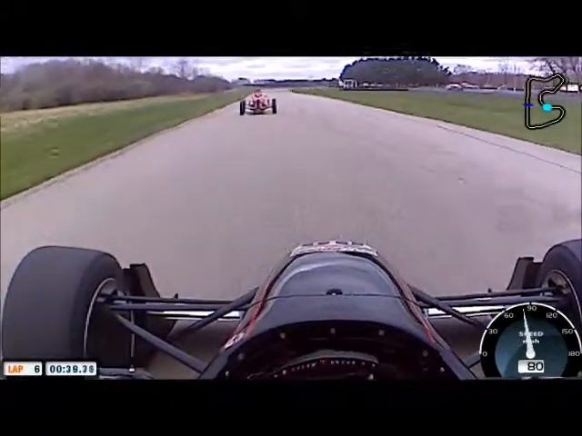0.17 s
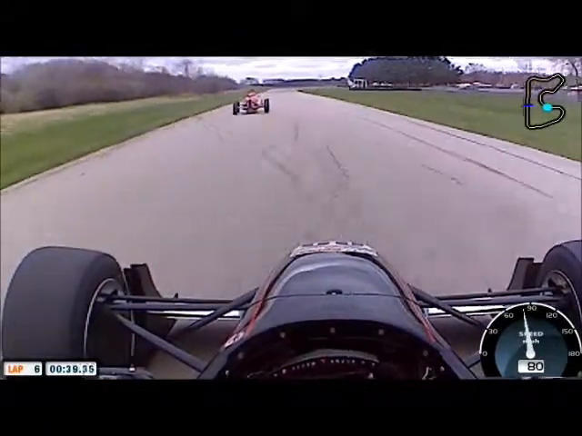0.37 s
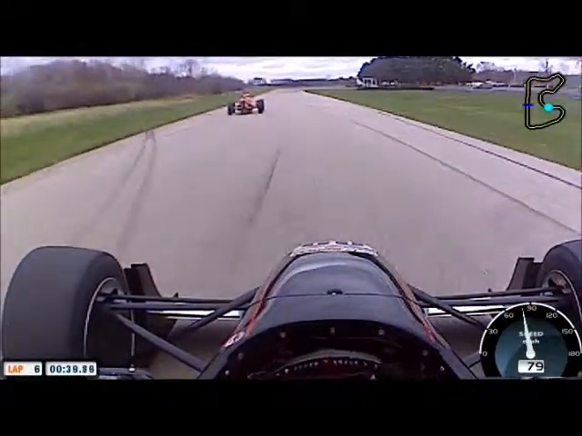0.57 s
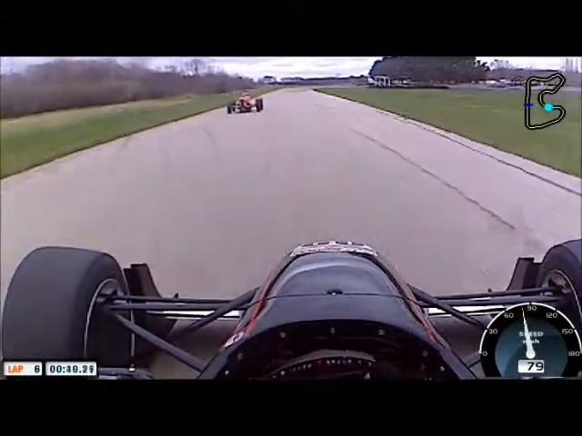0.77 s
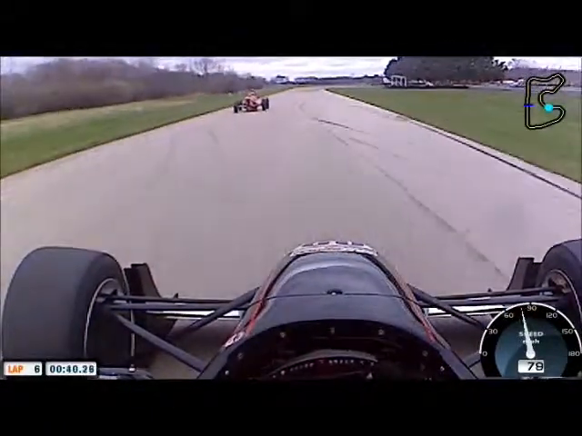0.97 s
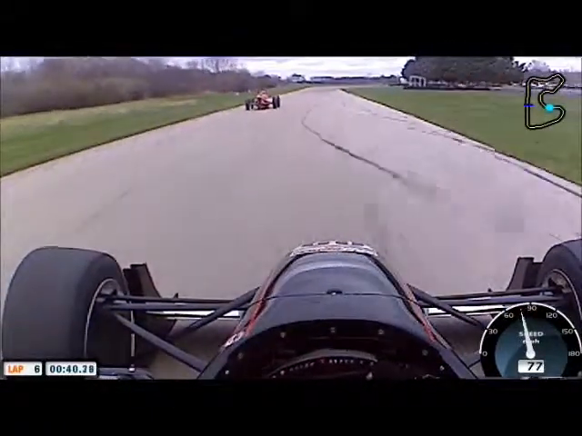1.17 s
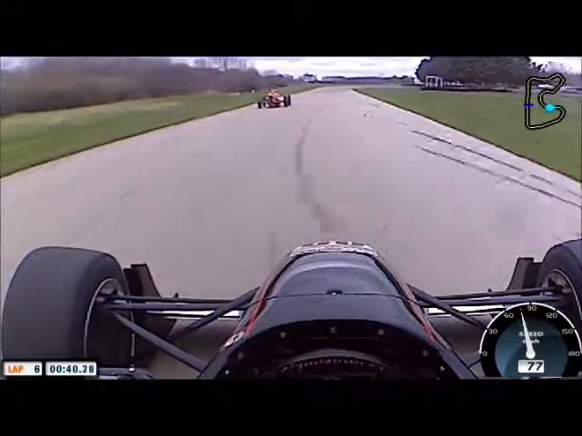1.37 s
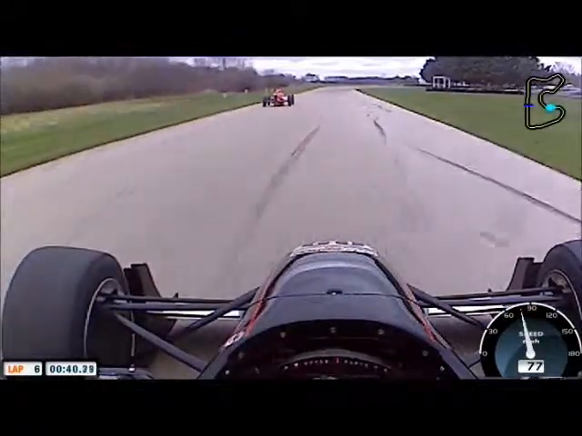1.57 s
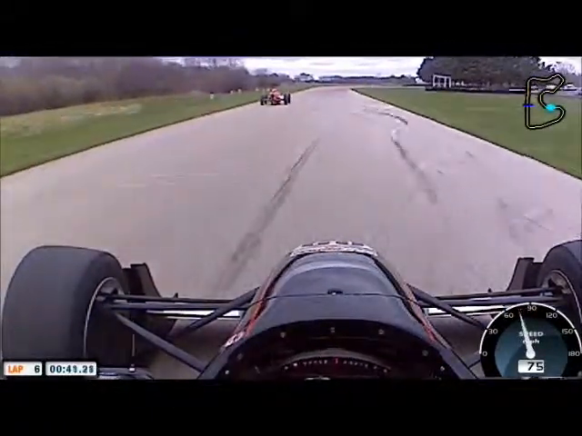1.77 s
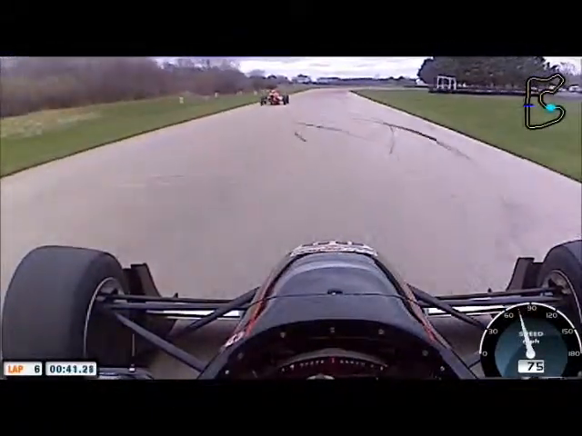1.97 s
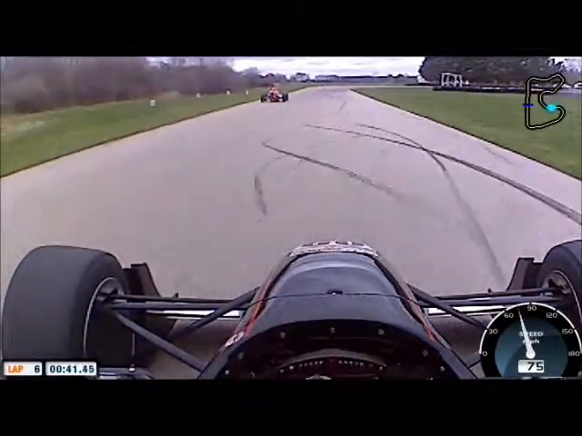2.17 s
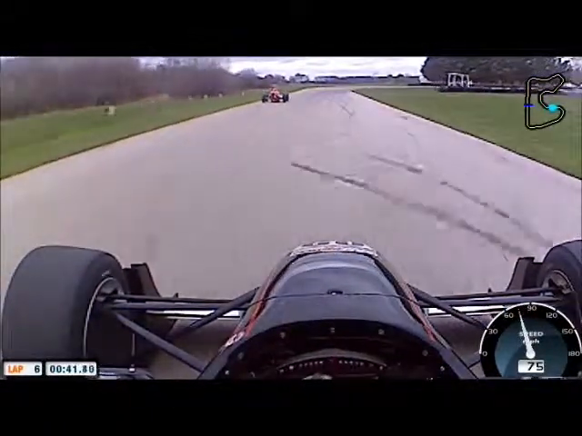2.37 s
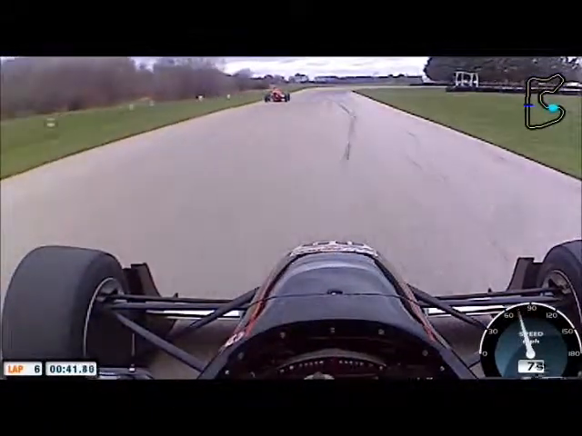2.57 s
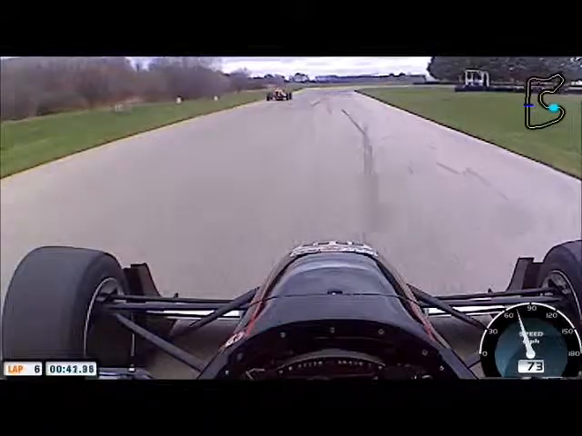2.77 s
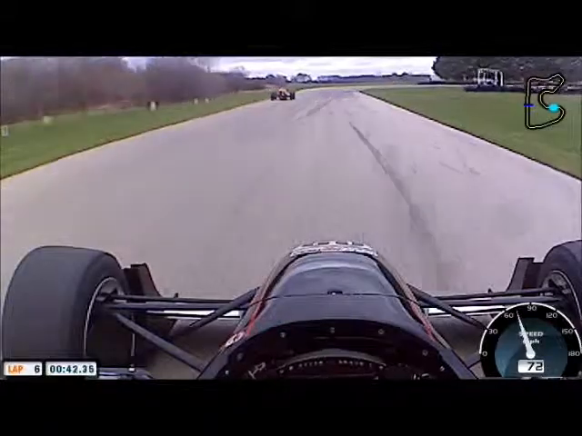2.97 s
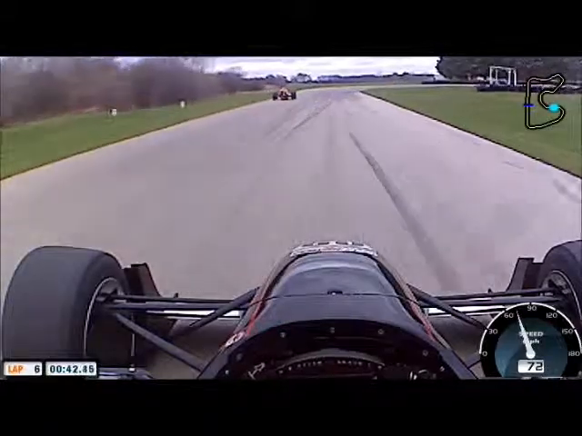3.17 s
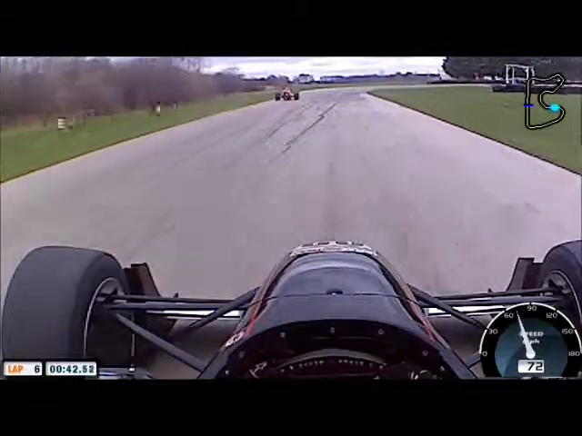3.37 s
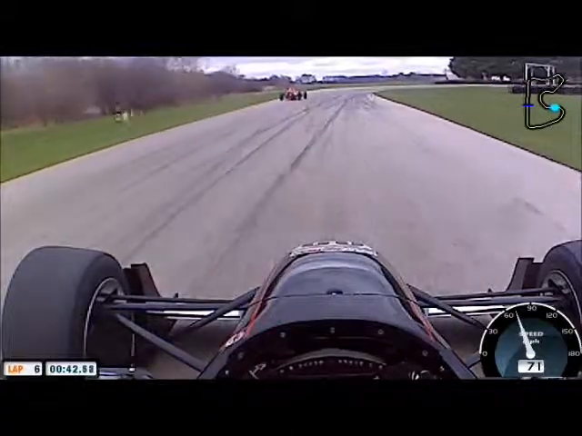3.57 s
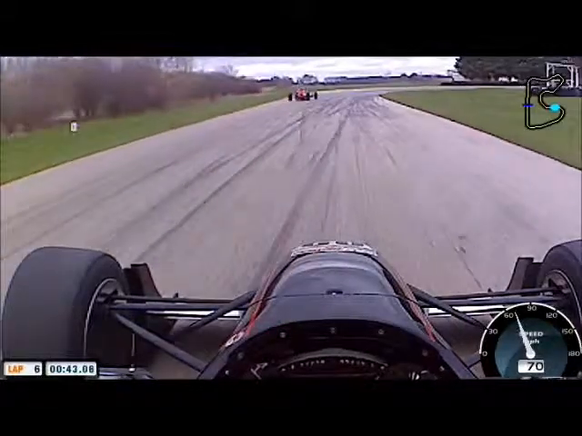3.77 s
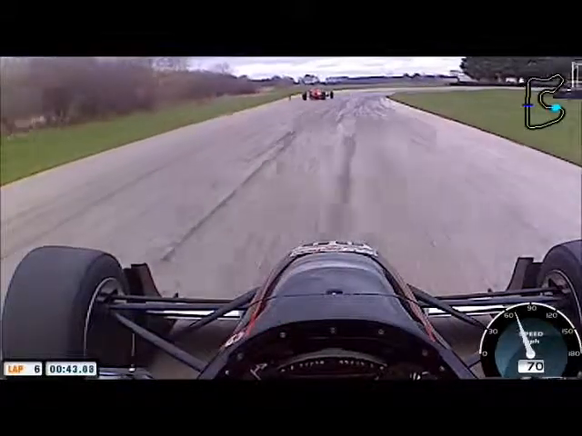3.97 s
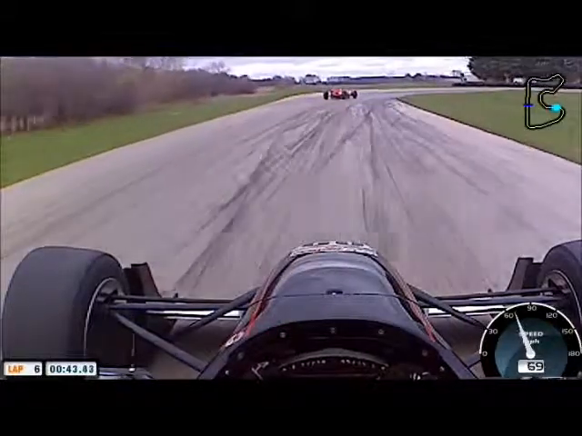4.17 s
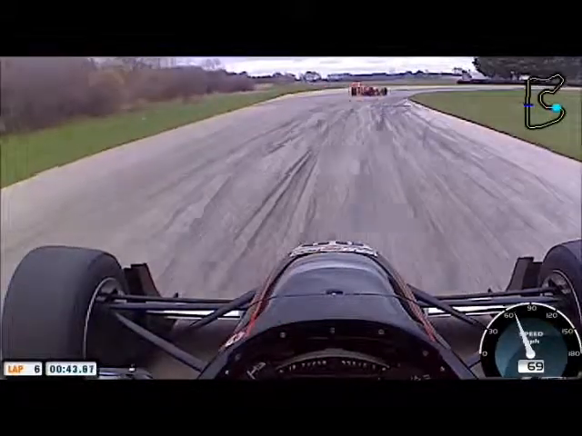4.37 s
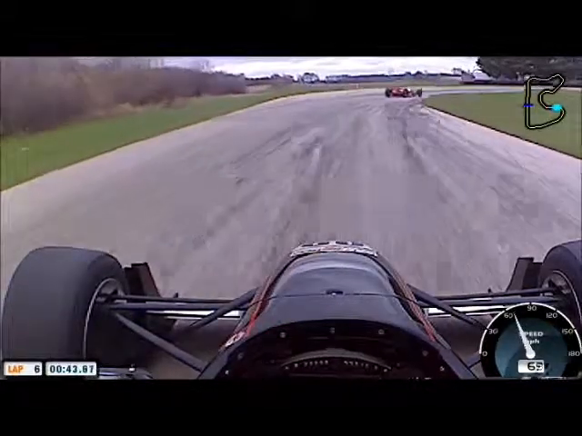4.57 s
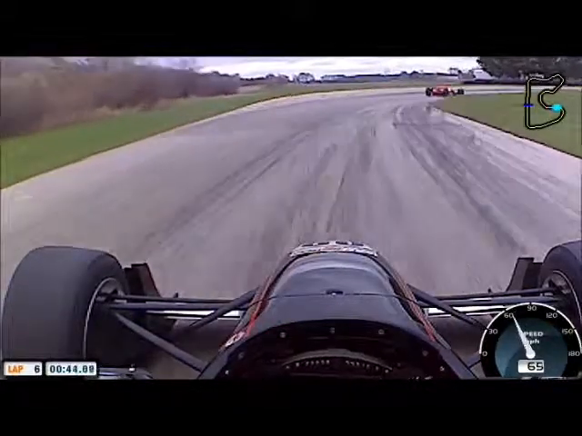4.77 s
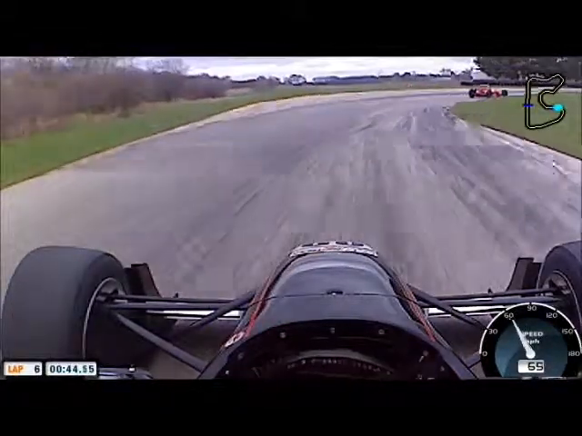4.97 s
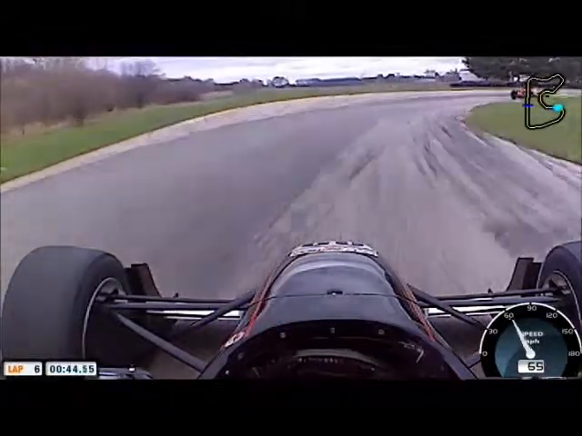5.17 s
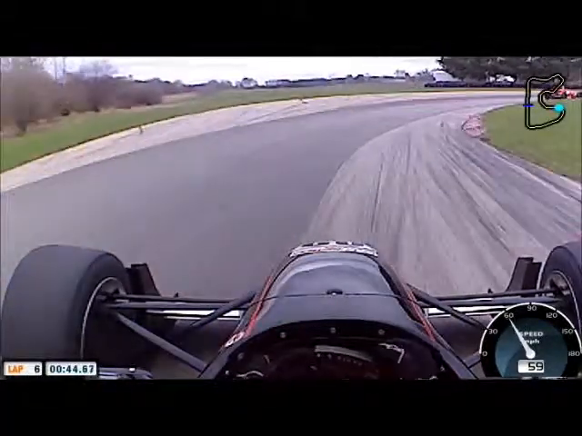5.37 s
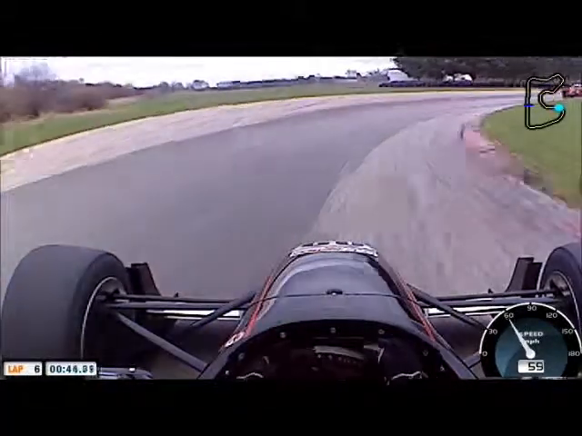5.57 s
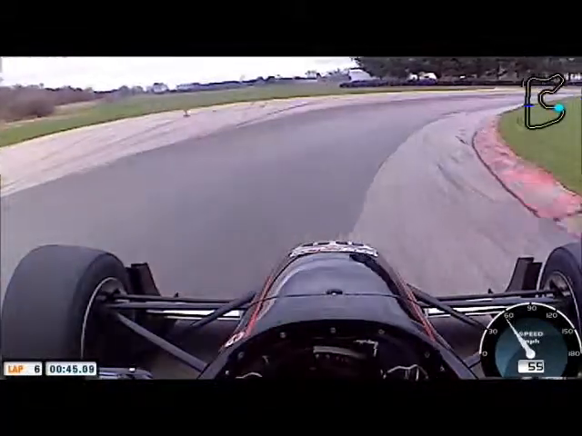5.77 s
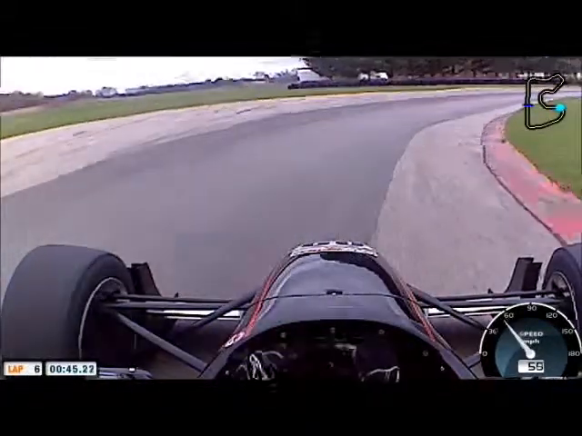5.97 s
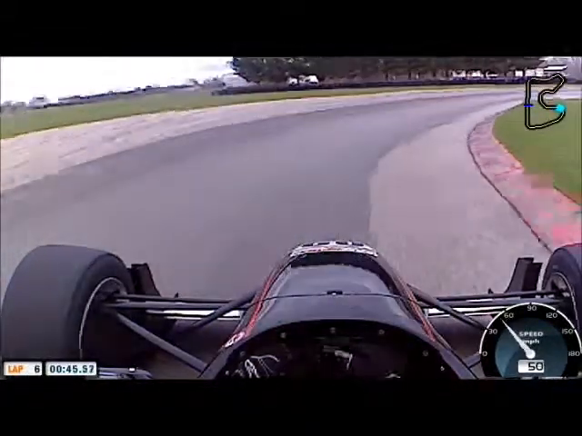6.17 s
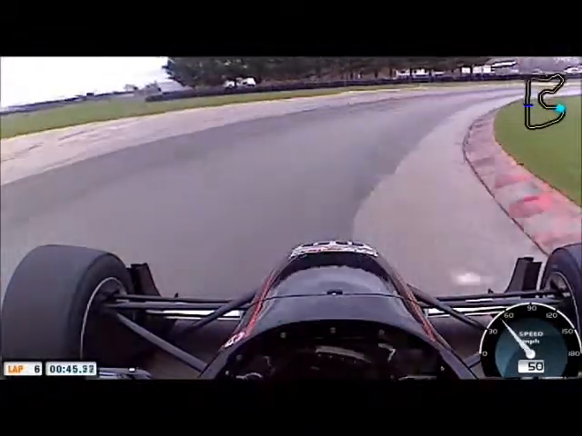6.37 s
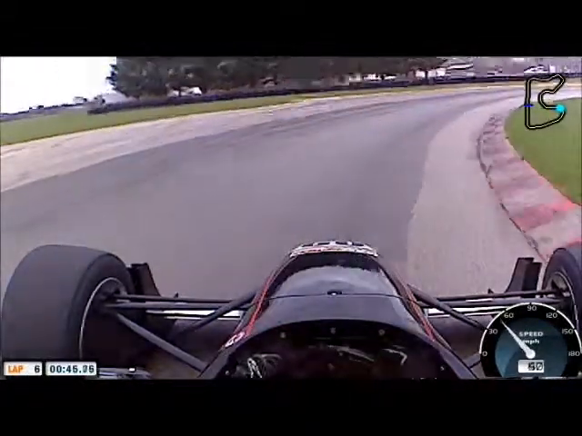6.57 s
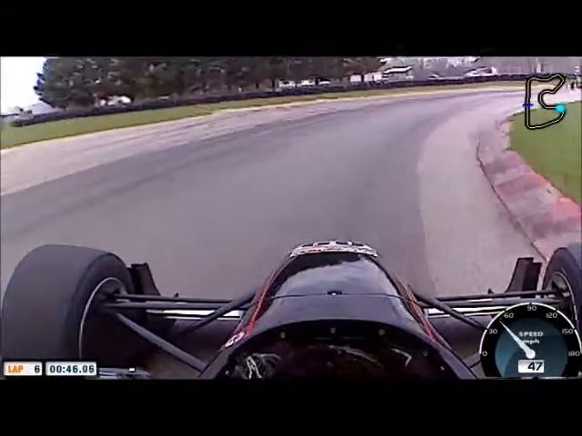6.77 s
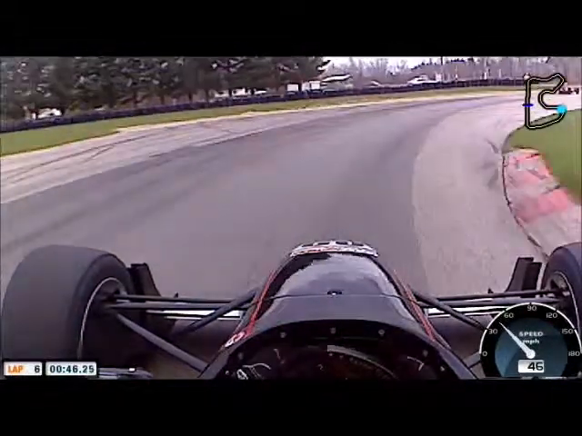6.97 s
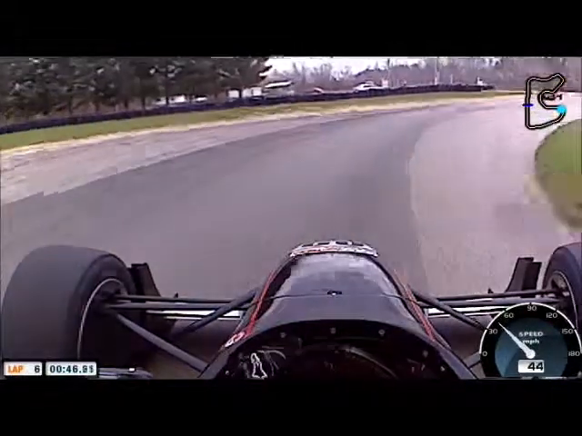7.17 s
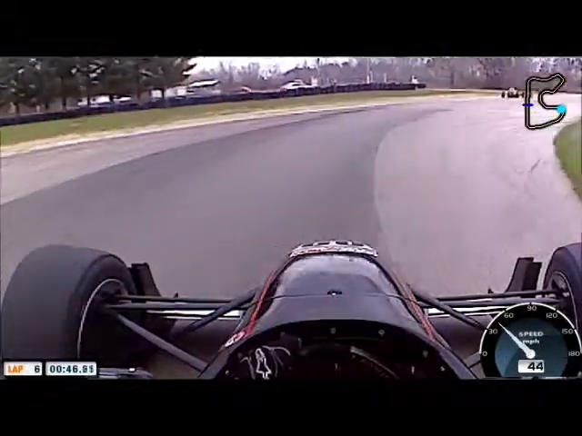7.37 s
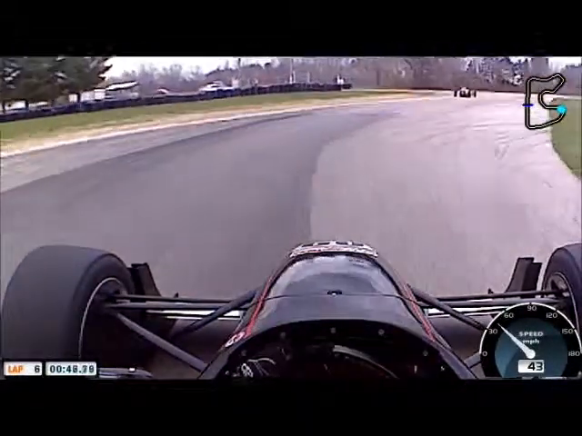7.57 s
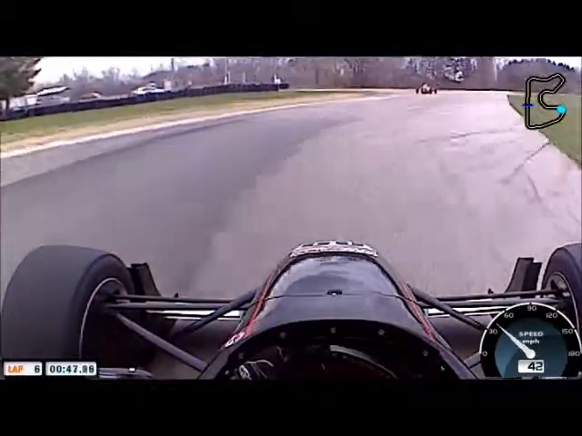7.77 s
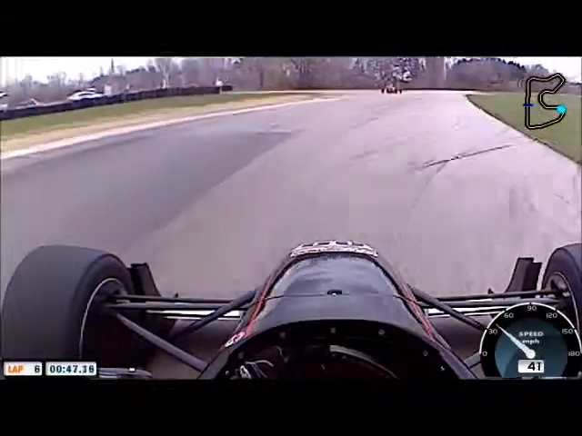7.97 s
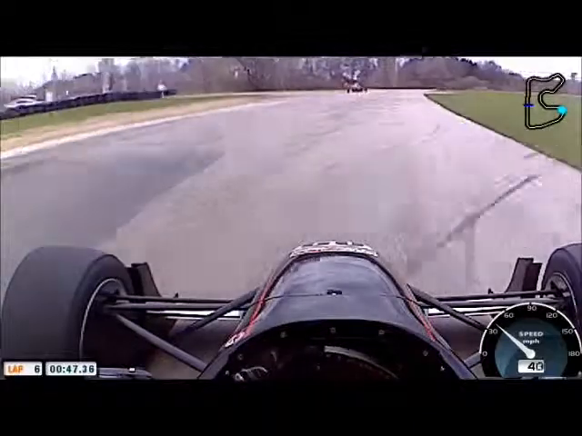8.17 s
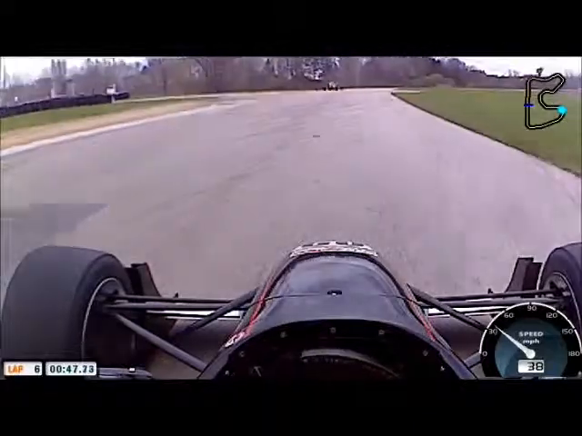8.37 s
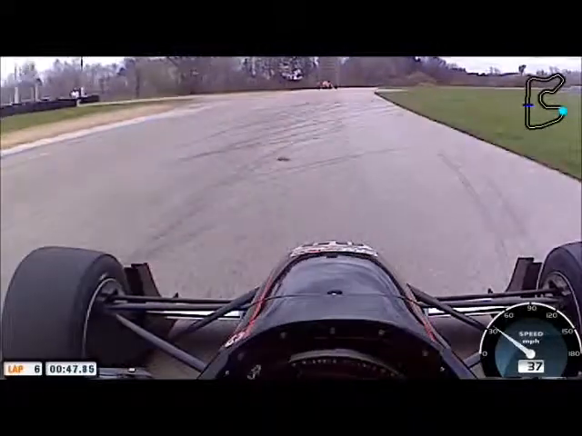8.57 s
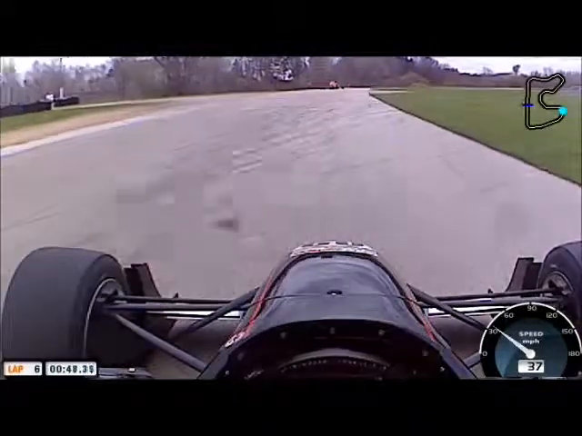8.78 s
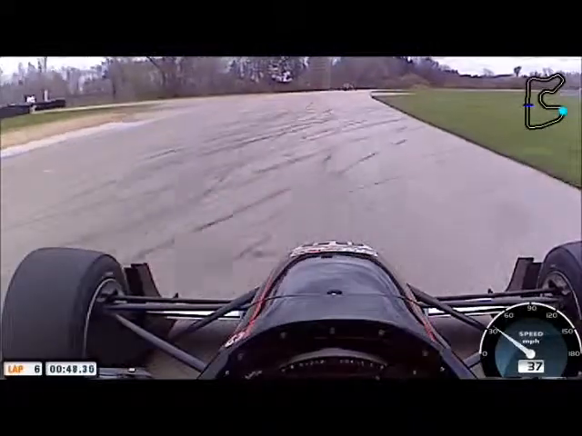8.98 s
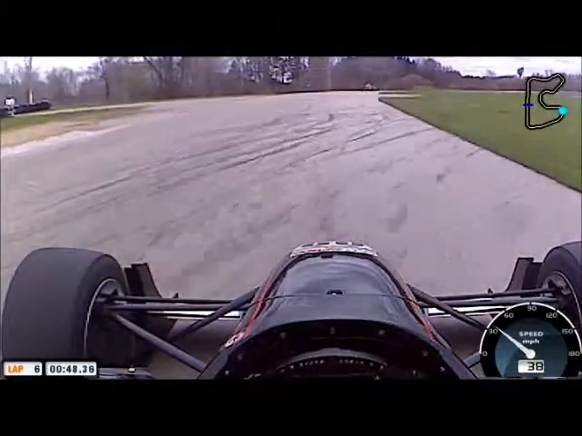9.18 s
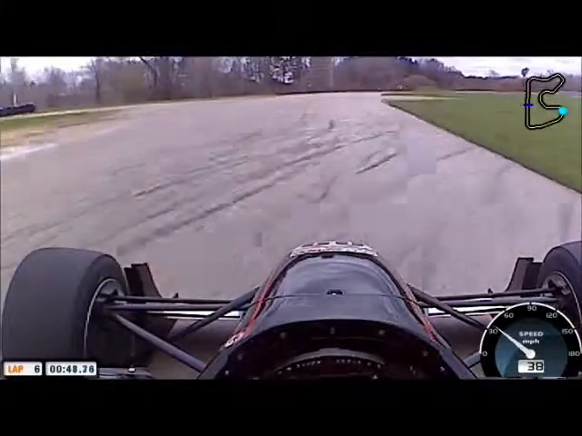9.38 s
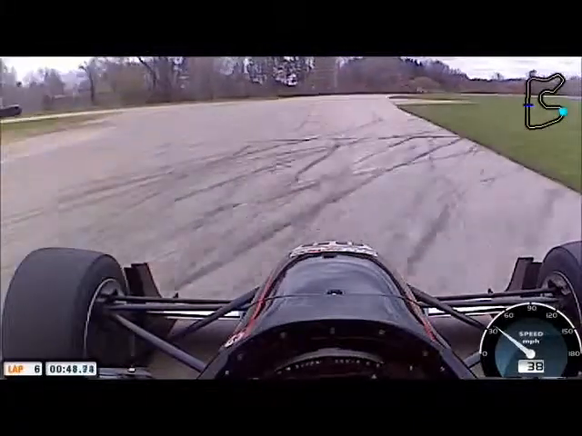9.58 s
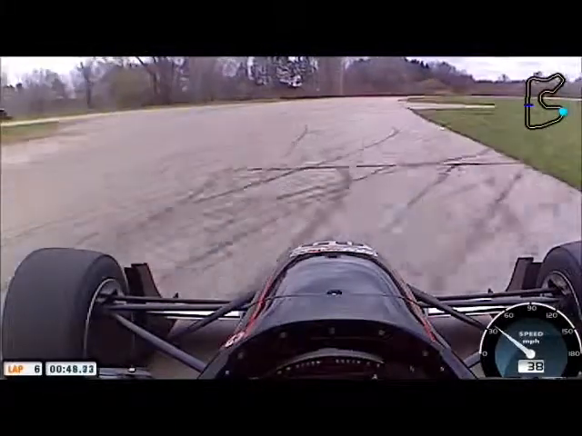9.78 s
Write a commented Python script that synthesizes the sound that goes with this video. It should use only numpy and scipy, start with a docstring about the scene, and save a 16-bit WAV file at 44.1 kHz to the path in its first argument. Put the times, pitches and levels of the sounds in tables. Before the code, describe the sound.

On board an open-wheel racing car, a deep engine growl lasts about a third of a second, drops in pitch and dies with a dull clunk. Wind buffeting and tyre rumble carry on, with a brief hum and scattered bumps. Later, metal clicks, faint brake squeals and tyre scrub mark a bend as the car slows. The microphone sits just above the cockpit, with dull, limited treble.

```python
"""On board an open-wheel racing car: the engine runs for a third of a second, then dies with a driveline clunk.
The car coasts on: shaped noise for wind, tyres and hiss follows speed and asphalt, and bumps thud in short bursts.
A drivetrain hum swells early and a whine enters later; the engine of a car ahead, a wavering tone, drones throughout.
From about 4.4 s cockpit metal clicks in noise bursts and the brakes squeal in sagging tones.
From 5 s the tyres scrub through a bend in band-shaped noise, and the pads rub in pulsed noise."""
import sys
import numpy as np
from scipy import signal
from scipy.fft import rfft, irfft, next_fast_len
from scipy.io import wavfile
from scipy.ndimage import map_coordinates

SR = 44100
rng = np.random.default_rng(int(sys.argv[2]) if len(sys.argv) > 2 else 0)


def unload_wav(signal):
    """Save mono or channel-first audio to the path in sys.argv[1] as 16-bit WAV at rate SR, clipped to [-1, 1]."""
    wavfile.write(
        sys.argv[1],
        SR,
        np.round(np.clip(np.atleast_2d(signal).T, -1, 1) * 32767).astype(np.int16),
    )


N = 433944

# Own engine, mean revs: t/s, four-stroke cycle rate f/Hz
ENGINE_REVS = [(0, 47.17), (0.29, 46.76), (0.36, 44.23), (0.42, 39), (0.55, 31.2), (0.7, 21.9)]
# Own engine, mix before trim: t/s, exhaust and roar level/dB, valve clatter level/dB
ENGINE_LEVELS = [(0, -11.5, -40), (0.12, -10, -40), (0.26, -12, -42), (0.32, -11.5, -35.5), (0.4, -16, -44),
                 (0.44, -19, -50), (0.55, -19, -80), (0.72, -48, -100)]
# Exhaust orders: multiple of the cycle rate, relative level/dB
EXHAUST_ORDERS = [(1, 1.5), (2, -0.5), (3, -10), (4, -9.5), (5, -15.5), (6, -29.5), (7, -33), (8, -37.5),
                  (9, -34), (10, -34)]
# Engine roar, spectrum: f/Hz, relative level/dB
ROAR_SPECTRUM = [(200, -3), (350, 1.5), (500, -6), (700, -9.5), (860, -25), (1050, -24), (1300, -12.5),
                 (1700, -19), (2400, -29.5)]
# Valve clatter, spectrum: f/Hz, relative level/dB
VALVE_SPECTRUM = [(1290, -38), (2200, -13), (2460, -14), (2750, -5), (2980, -7.5), (3620, -8.5), (4270, 2),
                  (4960, -10.5), (5940, -3), (6340, -11), (6790, -8), (7480, -13), (7890, -14),
                  (10300, -50), (17400, -120)]

# Road speed: t/s, speed/(m/s)
ROAD_SPEED = [(0, 38), (2, 35.2), (4, 31.1), (5, 24.9), (6, 23.3), (8, 18.4), (9.84, 14.8)]
# Roughness of the asphalt under the car: t/s, relative level/dB
ASPHALT_ROUGHNESS = [(0.75, -0.9), (1.15, 0.1), (1.7, -0.4), (1.95, -0.1), (2.3, 1.0), (2.65, -0.5),
                     (3.15, 3.5), (4.0, -1), (4.35, 1.1), (5.15, -3), (6.3, -2.4), (6.7, 0.4), (7.15, -2.0),
                     (7.55, 2.0), (8.2, -0.5), (8.8, 2.5), (9.15, 0), (9.84, 0.4)]
# Wind buffet, spectrum: f/Hz, relative level/dB
BUFFET_SPECTRUM = [(8, -15), (18, -1), (30, 0), (50, 0), (64, -6.5), (100, -32.5), (200, -79.5)]
# Tyre rumble, spectrum: f/Hz, relative level/dB
TYRE_SPECTRUM = [(30, -41), (48, -8.5), (62, 0), (85, -0.5), (108, -2), (130, -5), (165, -8.5), (200, -20),
                 (350, -61)]
# Road roar, also the thud of a bump, spectrum: f/Hz, relative level/dB
ROAD_SPECTRUM = [(110, -34), (175, -0.5), (225, -0.5), (270, -4.5), (320, -11), (400, -14.5), (500, -23),
                 (600, -24), (700, -32), (800, -41.5), (900, -47.5), (1300, -68.5)]
# Ring of the camera's housing, spectrum: f/Hz, relative level/dB
HOUSING_SPECTRUM = [(600, -38.5), (860, -26.5), (1000, -16.5), (1130, -9.5), (1210, -16), (1340, -2.5),
                    (1430, 2.5), (1480, 0.5), (1560, -15), (1760, -20), (1860, -13), (1980, -24),
                    (2600, -42.5)]
# Air and tyre hiss, spectrum: f/Hz, relative level/dB
HISS_SPECTRUM = [(1500, -20.5), (2120, -7), (2400, -2), (2750, 2), (3250, -3.5), (3650, -5), (3900, -6),
                 (4300, -5), (5200, -15.5), (5850, -12), (6250, -14), (6720, -7.5), (7300, -16.5),
                 (8000, -18.5)]
# Tyres sliding sideways, spectrum: f/Hz, relative level/dB
SCRUB_SPECTRUM = [(205, 8), (260, 39.5), (400, 11), (720, 13.5), (860, -2), (1150, 6.5), (1400, 18.5),
                  (1900, -9), (2800, -2), (3650, -3), (4600, -8), (5200, -9.5), (5800, -9.5), (6250, -7.5),
                  (6700, 1), (7900, -15)]
# Narrow resonances of the housing and panels: f/Hz, width/Hz, boost/dB
PANEL_RESONANCES = [(1660, 77, 5.5), (3635, 74, 4.5), (4800, 60, 6.5), (5500, 110, 2.5), (5850, 120, 2.5)]

# Brake squeals: t/s, length/s, starting pitch f/Hz, level before flicker/dB
BRAKE_SQUEALS = [(4.422, .52, 4590, -68.5), (5.416, .32, 4540, -73)]
# Pads brushing the discs: t/s, length/s, level at mid-rub/dB
PAD_RUBS = [(5.38, .4, -64.5), (8.97, .24, -68.5), (9.417, .5, -67)]
# Pad rub, spectrum: f/Hz, relative level/dB
PAD_SPECTRUM = [(3000, -19), (3900, -2), (4350, 1), (5000, -12.5), (5900, -10), (7000, -9), (7900, -15)]
# Bumps in the track, before envelope and trim: t/s, thud level/dB, housing ring level/dB
TRACK_BUMPS = [(0.791, -21, -50), (1.103, -20, -28.5), (2.819, -22, -53), (3.126, -20, -46),
               (3.681, -24, -32), (3.708, -16, -49), (4.262, -17, -38), (6.655, -24, -55),
               (8.256, -20, -46)]
# Cockpit clicks, before envelope and trim: t/s, level/dB, treble tilt/dB, body tilt/dB
COCKPIT_CLICKS = [(4.353, -43, -3, -12.5), (4.419, -46, -4, -12), (4.534, -35.5, -6, 1),
                  (4.745, -46.5, 1.5, -17), (4.816, -44, 0, -14), (5.8113, -34.5, -17, -19),
                  (5.8207, -35.5, -15, -12), (5.8523, -38, -9, -8), (5.874, -43, -12, -11),
                  (6.153, -34.5, -2, -6), (6.2532, -44, -6, -10), (6.2744, -35, -16, -10),
                  (6.3365, -47, -10, -12), (6.5063, -24.5, 0.5, -.5), (6.5124, -32, 0, 5),
                  (6.5288, -34.5, -9, 0), (6.573, -33.5, 1, 0), (6.6274, -44, -4, -10)]
# Small metal parts, spectrum: f/Hz, relative level/dB
METAL_SPECTRUM = [(800, -23), (1100, 1.5), (1370, 19), (1700, -2), (2100, -5.5), (2700, 1), (3700, -1.5),
                  (4750, -1.5), (5150, -11.5), (5600, -7.5), (6700, -8.5), (7900, -22.5)]
# Resonances of the small metal parts: f/Hz, width/Hz, boost/dB
METAL_RESONANCES = [(2760, 120, 3.5), (3350, 140, 4), (3750, 130, 5), (4280, 130, 6), (4920, 150, 5.5),
                    (5750, 200, 5), (6330, 130, 3), (6680, 130, 5)]
# Car ahead: t/s, mean exhaust note f/Hz, level before wavering/dB
CAR_AHEAD = [(0, 495.7, -54.5), (2.4, 523, -58), (3.5, 520, -65), (5, 460, -60), (5.4, 480, -54.5),
             (6.3, 480, -59.5), (7, 497, -63), (7.8, 517.3, -59), (9.84, 567.5, -60)]

CRUISE_M_PER_S = 30  # speed at which a rolling noise has its nominal level
WHEEL_M = 1.72  # distance rolled in one wheel turn
BEND_S, BEND_RISE_S, BEND_HOLD_S, BEND_RELEASE_S = 5.02, .35, 1, 2.6  # turn-in, then load envelope
SQUEAL_SAG_HZ_PER_S2 = 2200
RUBS_PER_TURN = 2
TOP_HZ = 7860  # middle of the 400 Hz wide treble cutoff


def amp(db):
    """Decibels to linear gain."""
    return 10 ** (np.asarray(db) / 20)


def unit(x):
    """x scaled to rms 1."""
    return x / np.sqrt(np.mean(x ** 2) + 1e-20)


def curves(rows):
    """One value per sample for each column after the time."""
    s, *cols = np.transpose(rows)
    return [np.interp(np.arange(N) / SR, s, c) for c in cols]


def wobble(rate):
    """A smooth random curve with rate knots a second."""
    knots = rng.standard_normal(int(N * rate / SR) + 4)
    return map_coordinates(knots, [np.arange(N) * rate / SR])


def turns(hz):
    """Cycles completed at a changing rate."""
    return np.cumsum(hz) / SR


def wheel_rate():
    """Wheel turns per second at the current road speed."""
    return curves(ROAD_SPEED)[0] / WHEEL_M


def swell(start, rise, hold, release):
    """An envelope in seconds that rises to 1, holds and falls back to 0."""
    t = np.arange(N) / SR - start
    return np.clip(np.minimum(t / rise, (rise + hold + release - t) / release), 0, 1)


def strike(t, t60, attack):
    """A quick onset with time constant attack, decaying by 60 dB in t60 seconds."""
    return amp(-60 * t / t60) * (1 - np.exp(-t / attack))


def filtered(x, response):
    """x through a gain that depends on frequency."""
    m = next_fast_len(len(x) + 8192)
    return irfft(rfft(x, m) * response(np.fft.rfftfreq(m, 1 / SR)), m)[:len(x)]


def coloured(x, spectrum):
    """x shaped by a spectrum on a log frequency axis, at -120 dB outside its points."""
    f, db = np.transpose(spectrum)
    return filtered(x, lambda hz: amp(np.interp(np.log(hz + 1), np.log(f), db, left=-120, right=-120)))


def boost(resonances, f):
    """Lift in dB at f from a set of resonances."""
    return sum(db / (1 + (2 * (f - hz) / width) ** 2) for hz, width, db in resonances)


def rush(spectrum, flutter_db, rate):
    """Turbulent noise of rms 1 whose strength flutters."""
    noise = rng.standard_normal(N) * amp(flutter_db * wobble(rate))
    return unit(coloured(noise, spectrum))


def tone(hz, waver, rate):
    """A sine of rms about 1 that wavers in pitch and strength."""
    phase = turns(hz * (1 + waver * wobble(rate)))
    return amp(1.6 * wobble(9)) * unit(np.sin(2 * np.pi * phase))


def add(track, s, sound):
    """Mix a sound in at time s."""
    part = track[max(round(s * SR), 0):][:len(sound)]
    part += sound[:len(part)]


def engine():
    """Exhaust, roar and valves follow one four-stroke cycle, which slows and fades as the engine dies."""
    cycle = turns(curves(ENGINE_REVS)[0] * (1 + .006 * wobble(16)))
    exhaust_db, clatter_db = curves(ENGINE_LEVELS)
    turning = np.arange(N) / SR < ENGINE_LEVELS[-1][0]
    pulses = exhaust(cycle, rough=0.28) + roar(cycle)
    valves = clatter(cycle, scatter_db=3.0, swing_db=4.5, pair_db=2.5, t60=0.0066, jitter=0.061, order=8)
    return turning * (amp(exhaust_db + 1.47) * pulses + amp(clatter_db - 3.0) * valves)


def exhaust(cycle, rough):
    """Sine orders of the four-stroke cycle, each wavering in strength on its own."""
    orders = []
    for k, db in EXHAUST_ORDERS:
        strength = amp(db) * (1 + rough * wobble(35.4))
        orders.append(strength * np.sin(2 * np.pi * (k * cycle + rng.random())))
    return unit(sum(orders))


def roar(cycle):
    """Broadband engine noise that pulses once for each cylinder in a cycle."""
    cylinders = 4
    pulse_db = 1.8 * np.cos(2 * np.pi * cylinders * cycle)
    return amp(-29.5 + pulse_db) * rush(ROAR_SPECTRUM, flutter_db=2.0, rate=30)


def clatter(cycle, scatter_db, swing_db, pair_db, t60, jitter, order):
    """Valves seat order times a cycle, strong and weak in turn, hardest on one side of the cycle."""
    at = np.flatnonzero(np.diff(np.floor(order * cycle + jitter * wobble(300))))
    swing = swing_db * np.cos(2 * np.pi * cycle[at])
    alternation = pair_db * np.cos(np.pi * order * cycle[at])
    blows = np.zeros(N)
    blows[at] = amp(scatter_db * rng.uniform(-1, 1, len(at)) + swing + alternation)
    ring = amp(-60 * np.arange(SR // 20) / SR / t60)
    envelope = signal.fftconvolve(blows, ring)[:N]
    ticks = coloured(envelope * rng.standard_normal(N), VALVE_SPECTRUM)
    return ticks / np.std(ticks[:SR // 3])  # level set while the engine still runs


def rolling():
    """Wind buffets the car; the tyres rumble and roar, throbbing once a wheel turn."""
    throb = np.sin(2 * np.pi * turns(wheel_rate()))
    buffet = driven(db=-28.0, speed_power=.7, surface_share=.4)
    buffet *= rush(BUFFET_SPECTRUM, flutter_db=2.2, rate=10)
    tyres = driven(db=-23.5, speed_power=0.77, surface_share=0.82) * amp(0.55 * throb)
    tyres *= rush(TYRE_SPECTRUM, flutter_db=0.65, rate=12)
    road = driven(db=-32.0, speed_power=1.16, surface_share=1.12) * amp(1.0 * throb)
    road *= rush(ROAD_SPECTRUM, flutter_db=1.16, rate=16)
    return buffet + tyres + road


def driven(db, speed_power, surface_share):
    """Gain of a rolling noise: a power of road speed, raised by a share of the asphalt's roughness."""
    surface_db = surface_share * curves(ASPHALT_ROUGHNESS)[0]
    return amp(db + surface_db) * (curves(ROAD_SPEED)[0] / CRUISE_M_PER_S) ** speed_power


def air():
    """Rushing air, tyre hiss and the scrub in the bend excite the camera's housing and the panels."""
    gust = amp(0.59 * wobble(22))
    ring = driven(db=-48.0, speed_power=0.99, surface_share=.3)
    ring *= rush(HOUSING_SPECTRUM, flutter_db=0.87, rate=40)
    hiss = driven(db=-56.5, speed_power=1.26, surface_share=0.34)
    hiss *= rush(HISS_SPECTRUM, flutter_db=1.02, rate=250)
    scrub = amp(-46.5) * bend() * rush(SCRUB_SPECTRUM, flutter_db=0.5, rate=55)
    return filtered(gust * (ring + hiss) + scrub, lambda f: amp(boost(PANEL_RESONANCES, f)))


def bend():
    """Sideways load on the tyres, 0-1."""
    return swell(BEND_S, BEND_RISE_S, BEND_HOLD_S, BEND_RELEASE_S)


def bumps(t60, attack, gain_db):
    """Each bump is a short burst of dull, road-coloured noise plus noise in the housing's ring."""
    out, t = np.zeros(N), np.arange(SR // 6) / SR
    for s, db, ring_db in TRACK_BUMPS:
        thud = amp(db) * unit(coloured(rng.standard_normal(len(t)), ROAD_SPECTRUM))
        ring = amp(ring_db) * unit(coloured(rng.standard_normal(len(t)), HOUSING_SPECTRUM))
        add(out, s, amp(gain_db) * strike(t, t60, attack) * (thud + ring))
    return out


def clunk(s, hz, db, t60):
    """The driveline takes up its slack once as the engine dies: one decaying sine."""
    out, t = np.zeros(N), np.arange(SR // 4) / SR
    add(out, s, amp(db) * strike(t, t60, attack=0.0022) * np.sin(2 * np.pi * hz * t))
    return out


def clicks(t60, attack, body_hz, treble_hz, gain_db):
    """Small metal parts scrape and catch: resonant noise bursts, each with its own treble and body."""
    out, t = np.zeros(N), np.arange(SR // 8) / SR
    for s, db, treble_db, body_db in COCKPIT_CLICKS:
        def response(f):
            treble = treble_db * (1 - 1 / (1 + (f / treble_hz) ** 8))
            body = body_db / (1 + (f / body_hz) ** 6)
            return amp(boost(METAL_RESONANCES, f) + treble + body)

        noise = coloured(rng.standard_normal(len(t)), METAL_SPECTRUM)
        scrape = unit(filtered(noise, response))
        add(out, s, amp(db + gain_db) * strike(t, t60, attack) * scrape)
    return out


def brakes(flicker_db):
    """The pads squeal faintly and brokenly, sagging ever faster in pitch."""
    out = np.zeros(N)
    for s, length, hz, db in BRAKE_SQUEALS:
        age = np.clip(np.arange(N) / SR - s, 0, length)
        squeal = tone(hz - SQUEAL_SAG_HZ_PER_S2 * age ** 2, waver=.004, rate=300)
        out += amp(db + flicker_db * wobble(45)) * np.sin(np.pi * age / length) * squeal
    return out


def pad_rub(pulse_db):
    """Slightly warped discs chafe the pads twice a wheel turn."""
    pulse = amp(pulse_db * np.sin(2 * np.pi * RUBS_PER_TURN * turns(wheel_rate())))
    contact = np.zeros(N)
    for s, length, db in PAD_RUBS:
        progress = np.clip((np.arange(N) / SR - s) / length, 0, 1)
        contact += amp(db) * np.sin(np.pi * progress)
    return contact * unit(pulse * rush(PAD_SPECTRUM, flutter_db=4.0, rate=150))


def running_gear(hum_per_turn, hum_db, whine_hz, whine_db):
    """The drivetrain hums briefly at a multiple of the wheel rate; a thin whine sets in as the car slows."""
    hum = swell(start=0.63, rise=0.75, hold=0.29, release=0.52)
    hum *= tone(hum_per_turn * wheel_rate(), waver=0.017, rate=16)
    whine = swell(start=3.3, rise=1.1, hold=1.1, release=9) * tone(whine_hz, waver=.008, rate=200)
    return amp(hum_db) * hum + amp(whine_db) * whine


def car_ahead():
    """The exhaust note of the car ahead, a wavering sine, sinks into the bend and climbs out of it."""
    hz, db = curves(CAR_AHEAD)
    return amp(db) * tone(hz, waver=.0015, rate=10)


def scene():
    """Everything as heard just above the cockpit."""
    braking = brakes(flicker_db=3.0) + pad_rub(pulse_db=2.5)
    gear = running_gear(hum_per_turn=5.45, hum_db=-25.0, whine_hz=3640, whine_db=-74)
    thuds = bumps(t60=0.08, attack=0.0044, gain_db=-3.5) + clunk(s=.433, hz=353, db=-22.0, t60=0.13)
    rattle = clicks(t60=0.048, attack=.0015, body_hz=1900, treble_hz=4200, gain_db=-3.0)
    return (engine() + rolling() + air() + thuds + rattle + braking + gear + car_ahead())[None]


def record(dry):
    """The camera rounds off the highest peaks, then cuts the treble at its band limit."""
    rounded = dry[0] / (1 + np.abs(dry[0] / .97) ** 8) ** (1 / 8)
    return filtered(rounded, lambda hz: np.clip((TOP_HZ - hz) / 400 + .5, 0, 1) ** 2)[None]


dry = scene()
out = record(dry)
unload_wav(out)
```